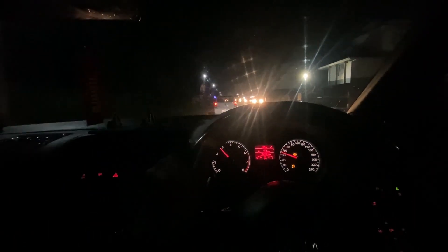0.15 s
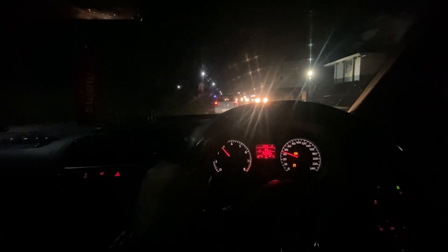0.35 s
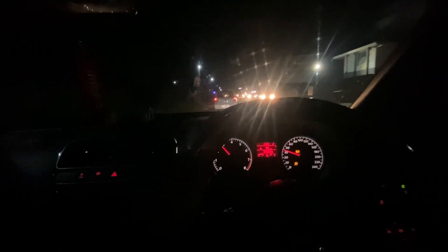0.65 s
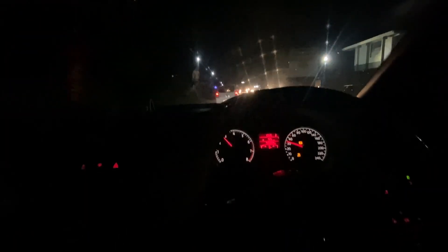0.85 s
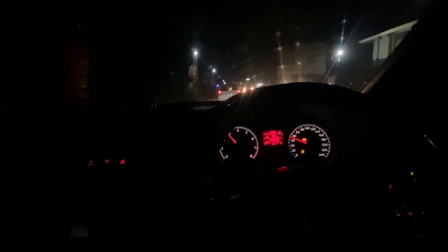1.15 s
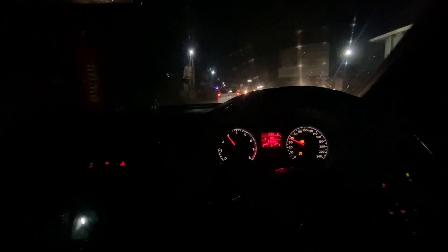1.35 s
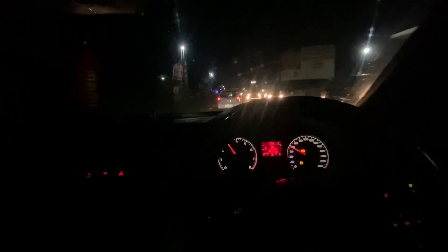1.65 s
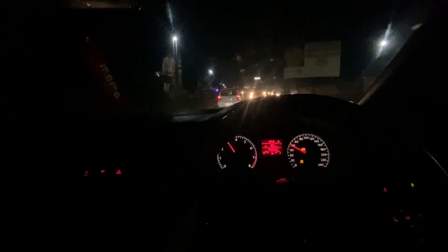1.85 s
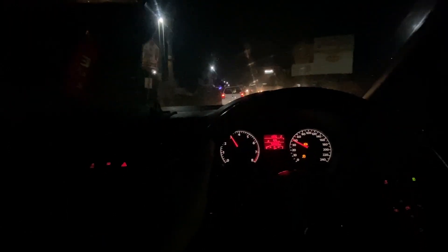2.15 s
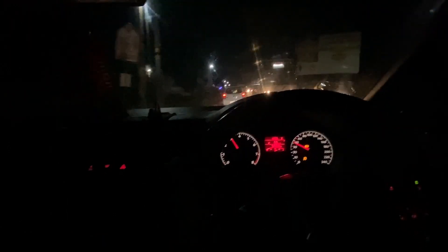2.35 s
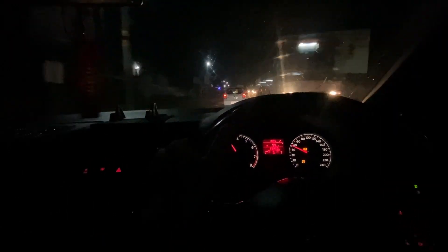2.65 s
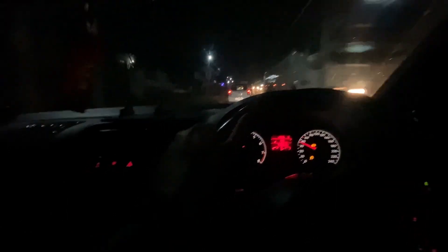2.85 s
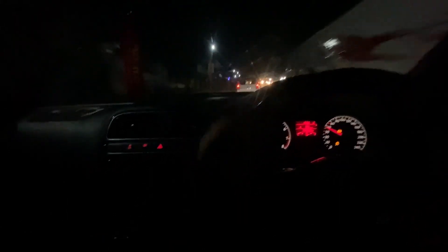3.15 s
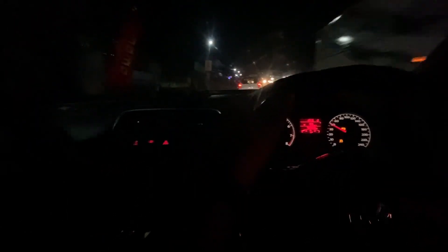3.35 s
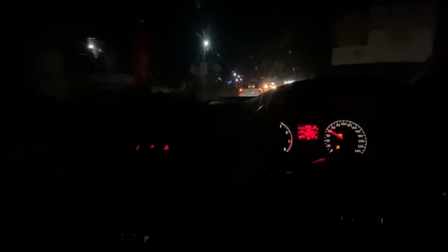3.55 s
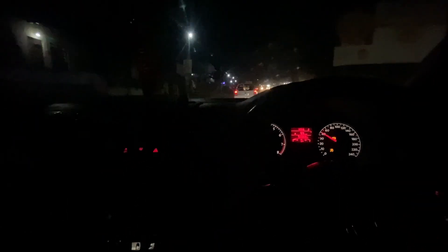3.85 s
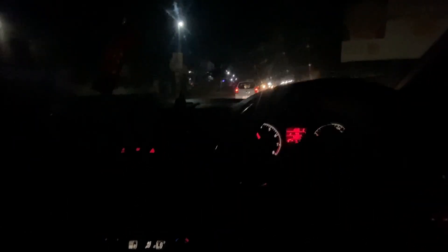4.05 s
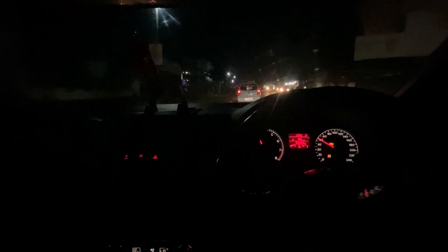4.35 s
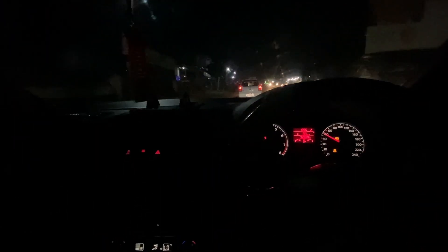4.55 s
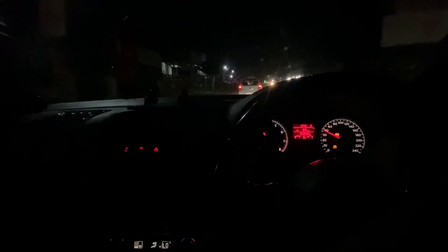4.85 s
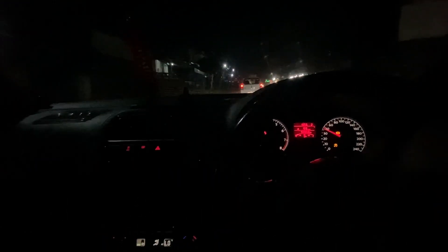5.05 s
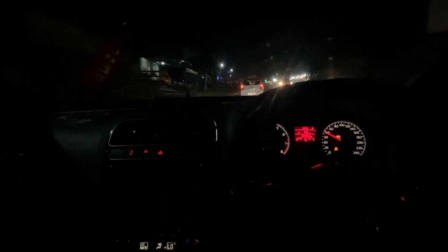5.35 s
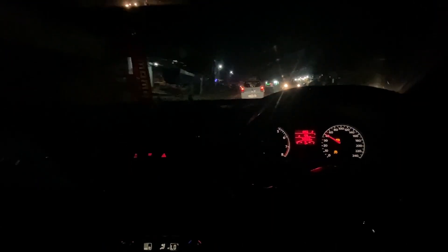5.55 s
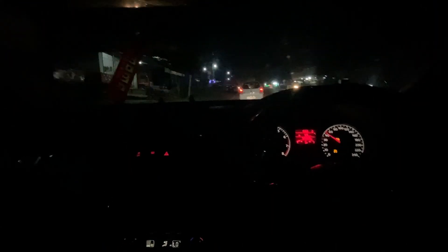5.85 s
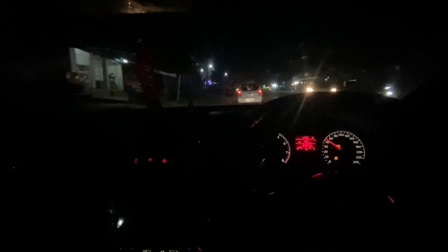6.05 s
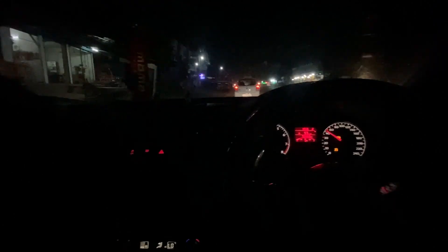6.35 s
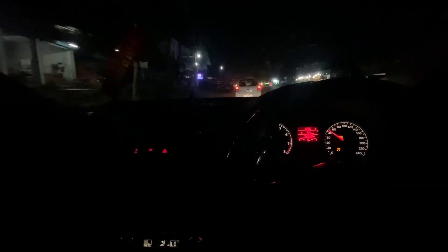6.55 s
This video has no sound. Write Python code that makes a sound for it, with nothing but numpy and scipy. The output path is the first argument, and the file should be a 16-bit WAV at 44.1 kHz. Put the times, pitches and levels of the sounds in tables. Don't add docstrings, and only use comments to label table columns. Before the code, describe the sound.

Inside a turbocharged car at night, a low engine boom swells and eases over road thuds, with three short hisses of venting air.

```python
import sys
import numpy as np
from scipy import signal
from scipy.fft import rfft, irfft, next_fast_len
from scipy.io import wavfile
from scipy.ndimage import uniform_filter1d

SR = 44100
rng = np.random.default_rng(int(sys.argv[2]) if len(sys.argv) > 2 else 0)


def digitize_waveform(pressure):
    field = np.atleast_2d(pressure).T
    bounded = np.clip(field, -1, 1)
    quanta = np.round(bounded * 32767).astype(np.int16)
    wavfile.write(sys.argv[1], SR, quanta)


def boost_factor(decibels):
    exponent = np.asarray(decibels, float) / 20
    return 10 ** exponent


N = 295136

# t/s, rate/Hz
CRUISE = [(0, 92.15), (.6, 92.65), (1.02, 95.6), (1.35, 105), (1.82, 104.2), (2.55, 98.7), (2.85, 102.7),
          (3.07, 101.5), (3.33, 109.5), (3.76, 110.3), (4.18, 103), (4.45, 103.8), (4.66, 101.8),
          (4.95, 105.5), (5.21, 104.8), (5.7, 119.1), (6.2, 119), (6.69, 112)]
# t/s, note surge/dB, time to bottom of sag/s
LIFTS = [
    (1.35, 10.5, 0.17),
    (3.34, 10, 0.14),
    (5.722, 4, 0.22),
]
SAG_HZ, REBOUND_S = 6.8, 0.28
SURGE_LEAD_S, SURGE_PEAK_S, SURGE_HOLD_S, SURGE_FADE_S = 0.09, 0.051, 0.22, 0.37
SURGE_HELD = 0.61
# t/s, level/dB
BOOM = [(0, -30.5), (.25, -30.5), (.4, -26.5), (.6, -34.5), (.8, -30), (.95, -26), (1.25, -22.5),
        (1.8, -25), (2.09, -22), (2.5, -16.5), (2.9, -20.5), (4.15, -19.5), (4.3, -13), (4.7, -14.5),
        (5.05, -10.5), (5.19, -20), (5.49, -13), (6.69, -12.5)]
# t/s, depth/dB, half length/s
REVERSALS = [(0.304, 17, 0.073), (0.45, 6, 0.089), (0.69, 32, 0.054), (1.734, 5, 0.082), (2.233, 8, 0.062),
             (2.679, 15, 0.028), (2.79, 12.5, .1), (3.688, 11, 0.049), (4.19, 7.5, 0.04), (4.322, 8, .02),
             (4.905, 17, 0.2), (6.038, 18.5, 0.05)]
# start/s, end/s, second order/dB, odd upper orders/dB, even upper orders/dB
PULLS = [(-.1, 0.25, -38, -46, -57), (0.593, .8, -39, -57.5, -48.5), (0.804, .97, -41.5, -55, -49),
         (0.974, 1.756, -35, -39.5, -55.5), (2.33, 2.603, -36, -44.5, -47),
         (2.846, 3.73, -34.5, -40.5, -45.5), (4.284, 4.583, -34, -37, -40.5),
         (4.604, 4.724, -38.5, -57, -51), (4.977, 5.26, -29, -37.5, -46), (5.266, 5.447, -34, -39.5, -42.5),
         (5.453, 5.65, -29.5, -37.5, -27.5), (5.758, 6.05, -31.5, -35.5, -29),
         (6.452, 6.603, -39.5, -50, -46), (6.602, 6.8, -53, -35, -32)]
COAST_DB, SURGE_SHARE = (-47.5, -53, -53), (0.98, 1.27, 1.43)
PEDAL_DB_PER_S = 160
DYING_DB, DYING_START_S, DYING_END_S = 10, 0.17, 0.65
FIFTH_DB, FIFTH_SURGE, FIFTH_BOOST_DB, BOOST_S = -3, -1.14, 8, 0.53
SIXTH_DB, SEVENTH_DB = -2, -6
RASP_START_S, RASP_S, RASP_DB = 4, 0.26, 9.2
UNEVEN_PER_S, UNEVEN_DB, FLUTTER_DB, WOBBLE = 3, 0.7, 1.6, 0.0008
# f/Hz, level/dB
PIPE = [(270, -4.5), (310, 0.5), (345, -13.5), (400, 0), (460, -11), (510, -5.5), (570, -14), (630, -5.5),
        (690, -10.5), (740, -22.5), (830, -15), (950, -30), (1040, -24.5)]
# order, start/s, end/s, level/dB
SINGS = [(5, 0.73, 0.9, 12), (7, 0.66, 1.1, -10), (5, 3.1, 3.2, -5.5), (5, 2.97, 3.4, 4),
         (8, 3.33, 3.47, 10.5), (3, 3.9, 4.12, 10), (4, 4.9, 5.25, 7.5), (6, 5.2, 5.45, -6),
         (7, 4.4, 6, 15.5), (8, 5.4, 6.2, 3), (3, 4.6, 5.55, -8), (7, 5.7, 5.8, 4.5), (4, 5.66, 5.77, 5),
         (4, 5.25, 5.45, 3.5), (3, .58, 1, -6.5), (4, .75, 1.1, 6), (5, 5.65, 6.05, -6), (6, 5.66, 5.78, 9),
         (8, 5.6, 7.8, -11), (9, 5.75, 5.9, 7), (3, 5.85, 6.8, -9), (4, 6.25, 6.5, 8.5),
         (2, 5.7, 5.72, -13.5), (6, 4.15, 4.55, 4.5), (7, 3.9, 4.55, 3.5), (5, .9, 1.05, -5),
         (5, 2.85, 2.98, -3.5), (6, 5.76, 5.5, 2.5)]
SING_EASE_S = 0.06
# t/s, peak/dB, rise/s, hold/s, fall/(dB/s)
OVERRUNS = [
    (5.62, -38, 0.041, 0.15, 158),
    (6.06, -37.5, 0.046, 0.48, 148),
]
OVERRUN_HZ = 307.4

# f/Hz, level/(dB per Hz)
ROAR = [(120, -44), (200, -10), (267, -6), (308, -1), (339, -7.5), (468, -5), (530, -10), (610, -18.5),
        (720, -21.5), (900, -16.5), (1020, -29.5), (1150, -20), (1400, -27), (1700, -27.5), (3500, -44),
        (9000, -76.5)]
ROAR_START_DB, ROAR_DB_PER_S, ROAR_DB_PER_HZ = -43.5, 0.9, 0.2066
ROAR_SURGE, ROAR_PULL_DB, PUFF_SHARE = 0.15, 2, 0.2
# f/Hz, level/(dB per Hz)
AIR = [(1200, -29.5), (2000, -5), (3100, -4), (3850, -4), (3920, -5), (3990, -7), (6800, -14.5),
       (7300, -16.5), (11400, -23), (12900, -30), (13800, -21.5), (15000, -30.5), (15400, -43)]
WIND_START_DB, WIND_DB_PER_S, WIND_DB_PER_HZ = -68.5, 0.87, 0.3225
# t/s, lift/dB, half length/s
TURBINE_LIFTS = [
    (2.45, 8, .15),
    (3.07, 11, 0.18),
    (4.63, 11, .25),
    (5.5, 5, .3),
]
TURBINE_HZ, TURBINE_DB = 3920, -21
# t/s, peak/dB, rise/s, hold/s, fall/(dB/s)
DRAINS = [
    (-.2, -59.5, .1, 0.47, 52),
    (1.48, -52.5, 0.14, 0.18, 76),
    (3.52, -52.5, 0.085, 0.15, 60.5),
    (5.83, -46, 0.12, 0.17, 68.5),
]
SIGH_HZ, SIGH_DB = (4900, 6500), -4

# t/s, peak/dB, rise/s, hold/s, fall/(dB/s)
VENTS = [
    (-.1, -50, .012, 0.2, 48),
    (1.512, -41.5, 0.0042, 0.057, 79.5),
    (3.485, -37.5, 0.009, 0.078, 78.5),
    (5.83, -33, 0.017, 0.068, 75.5),
]
# f/Hz, level/(dB per Hz)
JET = [(710, -23), (1200, 1.5), (1800, -6.5), (2300, -5), (3100, -3.5), (4700, -6.5), (6100, -3),
       (7250, -9), (9100, -5.5), (11400, -11.5), (12900, -12), (13600, -9.5), (14500, -11), (15200, -13.5)]
# f/Hz, width/Hz, lift/dB
JET_PEAKS = [(3730, 560, 2.5), (4770, 60, 5), (6550, 100, 0), (9000, 430, 3.5)]
# t/s, peak/dB, rise/s, hold/s, fall/(dB/s)
SNAPS = [
    (1.27, -39.5, 0.13, 0.23, 205.5),
    (3.325, -35.5, 0.027, 0.16, 206.5),
    (5.66, -32.5, 0.072, 0.18, 198),
]
# f/Hz, level/(dB per Hz)
GULP = [(300, -13.5), (560, 3.5), (800, 12.5), (1000, -3), (1300, 4), (1700, -2.5), (2250, -5.5),
        (2700, -9), (3400, -17), (6000, -20), (10000, -23.5), (11500, -30), (13000, -35.5), (15000, -41.5)]
GULP_DUCT_HZ, GULP_DUCT_WIDTH_HZ, GULP_DUCT_DB = 2250, 63, 4.3
CLIMB = 0.31
TREBLE_FALL, BASS_FALL = 0.063, 0.27
KNEE_S = 0.01
WHISTLE_HZ, WHISTLE_DB = 6304, -16

# t/s, suspension thud/dB, floor pan drum/dB
BUMPS = [(.03, -36, -42.5), (.26, -38, -43), (.39, -25, -31.5), (.56, -35.5, -42), (1.0, -31, -35.5),
         (1.14, -28, -41), (1.56, -27.5, -43), (1.76, -30.5, -37), (2.14, -27.5, -28), (2.24, -25, -25),
         (2.349, -24.5, -27.5), (2.68, -33, -32), (2.97, -27, -32.5), (3.16, -23.5, -35),
         (3.32, -24.5, -32), (3.78, -27.5, -34), (3.93, -36, -30.5), (4.09, -28.5, -30.5),
         (4.201, -23, -22.5), (4.31, -21.5, -25.5), (4.791, -24.5, -30), (4.99, -24.5, -35.5),
         (5.11, -26, -41), (5.27, -25, -30.5), (5.52, -26, -28), (5.721, -25.5, -30.5), (6.06, -23.5, -43),
         (6.2, -35.5, -36), (6.471, -24.5, -29.5), (6.6, -19, -25.5)]
# f/Hz, level/(dB per Hz)
THUD = [(20, -43.5), (33, -23), (42, 5.5), (58, 0.5), (75, -2.5), (90, -9.5), (120, -21.5), (200, -54)]
# f/Hz, level/(dB per Hz)
DRUM = [(50, -29.5), (75, -5), (105, 8.5), (150, 7), (175, -4), (220, -11.5), (400, -20.5), (700, -26.5),
        (1000, -54.5)]
SMOOTH_THUD_DB, SMOOTH_DRUM_DB = -34, -40.5
THUD_DB_PER_S, DRUM_DB_PER_S = (81, 61), (201, 118.5)
# t/s, peak/dB, length/s
KNOCKS = [(0.704, -37, 0.01), (1.123, -40, 0.01), (2.127, -31, 0.014), (2.165, -38, .01), (2.24, -35, .012),
          (2.285, -32, 0.02), (2.334, -32, 0.018), (2.804, -38, 0.01), (3.175, -34, 0.011),
          (3.334, -28, 0.014), (4.11, -35, .012), (4.146, -35, .01), (4.175, -34, .012), (4.205, -33, .012),
          (4.232, -33, .012), (4.297, -24, 0.01), (4.791, -33, .01), (5.205, -32, 0.01), (5.366, -31, .01),
          (5.518, -28, .01), (6.428, -34, .01)]
# f/Hz, level/dB, t60/s
STRUT = [(150, 6, .07), (270, -2, .05), (450, -2, .05), (560, -4, .05), (670, -1, .05), (950, -9, .03),
         (1300, -12, .025)]
STRUT_DB = -2
# t/s, peak/dB, low part/dB, pan/dB, length/s
TICKS = [(0.7607, -50, 7, 2, 0.011), (1.033, -57, 11.5, -1, 0.016), (1.116, -63, -1, 0, 0.01),
         (1.137, -48, 2, -1, 0.021), (1.387, -57.5, -3, -1, 0.013), (2.891, -54.5, 6, 4, 0.011),
         (3.361, -39, 5, 1.5, 0.021), (3.415, -52, 0, -1, 0.0093), (4.243, -50.5, 3.5, 6, 0.0047),
         (4.628, -34, 3.5, 1, 0.011), (4.627, -40.5, -10, 0, 0.008), (5.116, -31, 13.5, 7.5, 0.012),
         (5.206, -46.5, 15.5, 0, 0.0087), (5.215, -48.5, 2, 3.5, 0.016), (5.502, -49, 10.5, -7, 0.0081),
         (5.572, -52, 6, 2, 0.041), (5.72, -50, -6, -2, 0.03), (6.427, -46, -4.5, 5.5, 0.0044)]
CRACK_HZ = [4000, 3500, 9000, 5000, 8500, 4500, 3560, 5000, 4500, 2100, 4600, 4230, 4500, 5700, 4500, 4480,
            9300, 6000]
# f/Hz, level/dB, t60/s
TRIM = [(390, 2, 0.025), (520, 7, 0.03), (790, 6, 0.035), (1075, 1, 0.03), (1300, -1, 0.025),
        (1500, -2, 0.025), (1960, -4, 0.02), (2330, -7, 0.02)]
CRACK_SPREAD = 1.305
TREBLE_DB, TREBLE_LOSS, TREBLE_S = -14, 0.24, 0.016
RING_S, TAIL_DB = 0.13, -14
TICK_SAME, PORT_LAG = 0.65, 14
# t/s, peak/dB, rise/s, hold/s, fall/(dB/s)
COARSE = [
    (2.11, -48.5, 0.014, 0.21, 200),
    (4.12, -45, 0.064, 0.61, 55.5),
    (5.4, -39, 0.22, 0.47, 79.5),
    (6.45, -41.5, 0.089, .3, 102),
    (3.24, -37, 0.044, 0.22, 145.5),
]
# f/Hz, level/(dB per Hz)
GROWL = [(220, -8.5), (320, -4), (480, -1), (680, 0.5), (740, -14.5), (1000, -24.5), (1600, -31)]

# f/Hz, coherence
SAME = [(60, 1), (130, 0.94), (290, 0.48), (640, 0.71), (1400, 0.083), (3100, 0.22), (6800, 0.12),
        (15000, 0.26)]
# f/Hz, level/dB
LEAN = [(60, -4.5), (110, -5.0), (200, -7), (380, -0.5), (700, 2.5), (1290, 1.5), (2380, -2), (4400, 4),
        (8120, -1), (15000, -2.5)]
# f/Hz, lead/samples
LEAD = [(100, 21.5), (210, 32.5), (310, -16.5), (520, 2), (740, 24.5), (1200, -10), (1550, 14),
        (3000, 20.5), (8000, 21.5)]
RIPPLE_DB = 1.8
LOW_EDGE_HZ, TOP_EDGE_HZ = 39, 15200
NOTCH_HZ, NOTCH_HALF_HZ, NOTCH_DB = 12170, 430, -45
CEILING = 0.95
# f/Hz, level/dB
WHINE = [(11886, -93), (12107, -92)]
WHINE_GATE_DB = -57


def evened(x):
    return x / np.sqrt(np.mean(x ** 2) + 1e-20)


def read(points, hz):
    f, value = np.transpose(points)
    return np.interp(np.log(hz + 1), np.log(f + 1), value)


def curve(rows):
    s, value = np.transpose(rows)
    return np.interp(np.arange(N) / SR, s, value)


def bends(s, knots_s, values):
    return np.interp(np.arange(N) / SR - s, knots_s, values)


def slowly(law):
    at = np.arange(0, N + 32, 32)
    return np.interp(np.arange(N), at, law(at / SR))


def drift(per_s):
    lowpass = signal.butter(2, per_s, fs=SR / 32, output="sos")
    coarse = signal.sosfilt(lowpass, rng.standard_normal((N + SR) // 32 + 1))
    return evened(np.interp(np.arange(SR, SR + N) / 32, np.arange(len(coarse)), coarse))


def band(x, lo_hz, hi_hz):
    return signal.sosfilt(signal.butter(2, [lo_hz, min(hi_hz, SR / 2.1)], "band", fs=SR, output="sos"), x)


def noise(field_db, size, patchy_db):
    hop = size // 4
    hz = np.fft.rfftfreq(size, 1 / SR)[:, None]
    t = np.arange(N // hop + 5) * hop / SR
    a, b, c, d, patches = rng.standard_normal((len(t), len(hz), 5)).T
    patches = uniform_filter1d(patches, size=3, axis=0)
    patches = evened(uniform_filter1d(patches, size=16, axis=1))
    ripple_db = RIPPLE_DB * rng.standard_normal(hz.shape)
    same = read(SAME, hz)
    left = a + 1j * b
    delay = np.exp(-2j * np.pi * hz * read(LEAD, hz) / SR)
    right = same * left * delay + np.sqrt(1 - same ** 2) * (c + 1j * d)
    lean_db = read(LEAN, hz) / 2
    ports = np.array([left * boost_factor(lean_db), right * boost_factor(-lean_db)])
    z = ports * boost_factor(field_db(hz, t) + ripple_db + patchy_db * patches)
    return signal.istft(z, nperseg=size, noverlap=size - hop)[1][:, :N]


def steady(shape, size, patchy_db):
    def field_db(hz, t):
        outside = (hz < shape[0][0]) | (hz > shape[-1][0])
        return read(shape, hz) - 60 * outside + 0 * t
    return evened(noise(field_db, size, patchy_db))


def tone(hz, db):
    level = boost_factor(db + 2.5 * drift(4) + 2.5 * drift(30))
    return level * np.sin(2 * np.pi * np.cumsum(hz * (1 + 0.003 * drift(25))) / SR)


def flow_db(rows, t, speed, late=0):
    power = 1e-20
    for s, db, rise, hold, fall in rows:
        opening = np.clip((t - s) / rise - late, 0, 1) ** 2
        since_hold = t - s - hold
        bleed_s = (since_hold + np.hypot(since_hold, KNEE_S)) / 2
        power = power + opening * boost_factor(2 * (db - fall * speed * bleed_s))
    return 10 * np.log10(power)


def flow(rows, speed=1):
    return slowly(lambda t: flow_db(rows, t, speed))


def firing_hz():
    sag = sum(bends(s, [0, low_s, low_s + REBOUND_S], [0, SAG_HZ, 0]) for s, _, low_s in LIFTS)
    return curve(CRUISE) - sag


def surge_db():
    knots_s = [-SURGE_LEAD_S, SURGE_PEAK_S, SURGE_HOLD_S, SURGE_FADE_S]
    return sum(bends(s, knots_s, [0, db, SURGE_HELD * db, 0]) for s, db, _ in LIFTS)


def pedal_db():
    t = np.arange(N) / SR
    return [-PEDAL_DB_PER_S * np.maximum(np.maximum(a - t, t - b), 0) for a, b, *_ in PULLS]


def orders():
    swell, off = surge_db(), pedal_db()
    cancel = sum(bends(s, [-half, 0, half], [0, db, 0]) for s, db, half in REVERSALS)
    boom_db = curve(BOOM) + swell - cancel
    dying_s = [DYING_START_S, DYING_END_S, DYING_END_S + 0.05]
    dying = sum(bends(s, dying_s, [0, DYING_DB, 0]) for s, *_ in LIFTS)
    boost_s = [-BOOST_S, 0.1 - BOOST_S, 0.05, 0.12]
    boost = sum(bends(s, boost_s, [0, FIFTH_BOOST_DB, FIFTH_BOOST_DB, 0]) for s, *_ in LIFTS)
    levels = []
    for k, (idle_db, share) in enumerate(zip(COAST_DB, SURGE_SHARE)):
        loaded = np.max([row[2 + k] + drop for row, drop in zip(PULLS, off)], axis=0)
        if k > 0:
            loaded = loaded - dying
        levels.append(np.maximum(loaded, idle_db) + share * swell)
    return boom_db, *levels, FIFTH_DB + FIFTH_SURGE * swell + boost


def sing_db(order):
    total = np.zeros(N)
    for k, a, b, db in SINGS:
        if round(k) == order:
            total += bends(a, [-SING_EASE_S, 0, b - a, b - a + SING_EASE_S], [0, db, db, 0])
    return total


def engine():
    hz = firing_hz()
    boom_db, second_db, odd_db, even_db, fifth_db = orders()
    turns = np.cumsum(hz * (1 + WOBBLE * drift(22))) / SR
    rasp_db = bends(RASP_START_S, [-0.03, 0, RASP_S, RASP_S + 0.034], [0, RASP_DB, RASP_DB, 0])
    extra_db = {5: fifth_db, 6: SIXTH_DB + rasp_db, 7: SEVENTH_DB + 2 * rasp_db}
    out = np.zeros((2, N))
    for k in range(1, 10):
        if k == 1:
            level_db = boom_db
        elif k == 2:
            level_db = second_db + sing_db(2)
        else:
            level_db = (odd_db if k % 2 else even_db) + read(PIPE, k * hz) + sing_db(k) + extra_db.get(k, 0)
            level_db = level_db + UNEVEN_DB * drift(UNEVEN_PER_S) + FLUTTER_DB * drift(25)
        lean_db = read(LEAN, k * hz) / 2
        late = np.array([0 * hz, hz * read(LEAD, k * hz) / SR])
        level = np.sqrt(2) * boost_factor(level_db + np.array([lean_db, -lean_db]))
        out += level * np.cos(2 * np.pi * k * (turns - late) + 0.579 * k ** 2)
    return out, turns


def bay_roar(turns):
    t, revs_hz = np.arange(N) / SR, curve(CRUISE) - 100
    pulling = uniform_filter1d(boost_factor(np.max(pedal_db(), axis=0)), size=6000)
    level_db = ROAR_START_DB + ROAR_DB_PER_S * t + ROAR_DB_PER_HZ * revs_hz
    level_db = level_db + ROAR_SURGE * surge_db() + ROAR_PULL_DB * pulling
    puffs = evened(1 + PUFF_SHARE * np.cos(2 * np.pi * turns))
    return boost_factor(level_db) * puffs * steady(ROAR, size=2048, patchy_db=1.9)


def wind():
    t, revs_hz = np.arange(N) / SR, curve(CRUISE) - 100
    wind_db = WIND_START_DB + WIND_DB_PER_S * t + WIND_DB_PER_HZ * revs_hz
    air_db = 10 * np.log10(boost_factor(2 * wind_db) + boost_factor(2 * flow(DRAINS)))
    lift_db = sum(bends(s, [-half, 0, half], [0, db, 0]) for s, db, half in TURBINE_LIFTS)
    turbine = boost_factor(lift_db) * tone(TURBINE_HZ, TURBINE_DB)
    return boost_factor(air_db + 4.5) * (steady(AIR, size=1024, patchy_db=1.3) + turbine)


def sigh():
    air = band(band(rng.standard_normal((2, N)), *SIGH_HZ), *SIGH_HZ)
    return boost_factor(flow(DRAINS, 0.8) + SIGH_DB + 1.5 * drift(30)) * evened(air)


def jet(rows, shape, peaks, climb=0):
    def field_db(hz, t):
        colour = read(shape, hz) + sum(db / (1 + ((hz - f) / w) ** 2) for f, w, db in peaks)
        colour = colour - 60 * (hz < shape[0][0])
        colour = colour - 10 * np.log10(np.sum(boost_factor(2 * colour)))
        octaves = np.log2(np.maximum(hz, 500) / 3500)
        speed = 1 + np.maximum(TREBLE_FALL * octaves, -BASS_FALL * octaves)
        return colour + flow_db(rows, t, speed, climb * np.clip(octaves + 2, 0, 2))
    return noise(field_db, size=512, patchy_db=2.9)


def vent():
    return jet(VENTS, JET, JET_PEAKS)


def jolts(column, smooth_db, slopes):
    rise, fall = slopes

    def level_db(t):
        peaks = [row[column] - np.maximum(rise * (row[0] - t), fall * (t - row[0])) for row in BUMPS]
        return np.maximum(np.max(peaks, axis=0), smooth_db)
    return boost_factor(slowly(level_db))


def road():
    thud = jolts(1, SMOOTH_THUD_DB, THUD_DB_PER_S) * steady(THUD, size=4096, patchy_db=-3)
    drum = jolts(2, SMOOTH_DRUM_DB, DRUM_DB_PER_S) * steady(DRUM, size=2048, patchy_db=-0.5)
    return thud + boost_factor(7) * drum


def burst(t, length_s):
    attack = 1 - np.exp(-20 * t / length_s)
    shape = attack * (np.exp(-t / length_s) + boost_factor(TAIL_DB - 60 * t / RING_S))
    a, b = rng.standard_normal((2, len(t)))
    return shape * np.array([a, TICK_SAME * np.roll(a, PORT_LAG) + np.sqrt(1 - TICK_SAME ** 2) * b])


def knocks():
    out, t = np.zeros((2, N + SR)), np.arange(SR // 5) / SR
    for s, db, length_s in KNOCKS:
        detune = rng.uniform(0.88, 1.12, len(STRUT))
        ring = sum(boost_factor(g - 60 * t / t60) * np.sin(2 * np.pi * f * d * t)
                   for (f, g, t60), d in zip(STRUT, detune))
        rattle = boost_factor(2.5) * band(band(burst(t, length_s), 150, 1250), 170, 750)
        knock = rattle + boost_factor(STRUT_DB) * np.array([ring, np.roll(ring, PORT_LAG)])
        out[:, round(s * SR):][:, :len(t)] += boost_factor(db) * knock
    return out[:, :N]


def ticks():
    out, t = np.zeros((2, N + SR)), np.arange(SR // 5) / SR
    panel = sum(boost_factor(db - 60 * t / t60) * np.sin(2 * np.pi * f * t) for f, db, t60 in TRIM)
    panel = panel * (1 - np.exp(-t / 0.002))
    panel = panel[None] / np.linalg.norm(panel)
    for (s, db, low_db, pan_db, length_s), hz in zip(TICKS, CRACK_HZ):
        treble_db = TREBLE_DB - TREBLE_LOSS * (db + 45)
        hiss = burst(t, length_s)
        blow = np.sqrt(length_s * SR / 2) * np.exp(-t * 8000) / 2
        strike = 0.5 * hiss + np.array([blow, np.roll(blow, PORT_LAG)]) / 2
        ring = signal.fftconvolve(strike, panel, axes=1)[:, :len(t)]
        crack = 1.57 * band(hiss, hz / CRACK_SPREAD, hz * CRACK_SPREAD)
        treble = 3.8 * boost_factor(treble_db) * np.exp(-t / TREBLE_S) * band(hiss, 2900, 15000)
        pan = boost_factor(db + np.array([[pan_db], [-pan_db]]) / 2)
        out[:, round(s * SR):][:, :len(t)] += pan * (crack + treble + boost_factor(low_db) * ring)
    return out[:, :N]


def gulp():
    return jet(SNAPS, GULP, [(GULP_DUCT_HZ, GULP_DUCT_WIDTH_HZ, GULP_DUCT_DB)], CLIMB)


def whistle():
    return boost_factor(flow(VENTS[1:], 1.8)) * tone(WHISTLE_HZ, WHISTLE_DB)


def tyres():
    return boost_factor(flow(COARSE) + 3 * drift(40)) * steady(GROWL, size=512, patchy_db=2)


def overrun():
    phase = 2 * np.pi * OVERRUN_HZ * np.cumsum(1 + 0.004 * drift(6)) / SR
    return np.sqrt(2) * boost_factor(flow(OVERRUNS) + 1.2 * drift(11)) * np.cos(phase)


def whine():
    t = np.arange(N) / SR
    tones = sum(np.sqrt(2) * boost_factor(db) * np.sin(2 * np.pi * f * t) for f, db in WHINE)
    venting_db = flow([(s + 0.04, *row) for s, *row in VENTS])
    return tones * (venting_db < WHINE_GATE_DB)


def scene():
    note, turns = engine()
    air = wind() + sigh() + vent() + gulp() + whistle()
    return note + bay_roar(turns) + air + road() + knocks() + ticks() + tyres() + overrun()


def top_cut(x):
    return signal.sosfilt(signal.butter(12, 15890, fs=SR, output="sos"), x)


def record(dry):
    size = next_fast_len(N + SR // 4)
    hz = np.fft.rfftfreq(size, 1 / SR)
    edges = 1 / np.sqrt((1 + (LOW_EDGE_HZ / (hz + 1)) ** 8) * (1 + (hz / TOP_EDGE_HZ) ** 160))
    notch = boost_factor(NOTCH_DB * np.exp(-((hz - NOTCH_HZ) / NOTCH_HALF_HZ) ** 4))
    heard = irfft(rfft(dry, size) * edges * notch, size)[:, :N]
    limited = heard / (1 + (heard / CEILING) ** 6) ** (1 / 6)
    return top_cut(limited + whine())


dry = scene()
out = record(dry)
digitize_waveform(out)
```